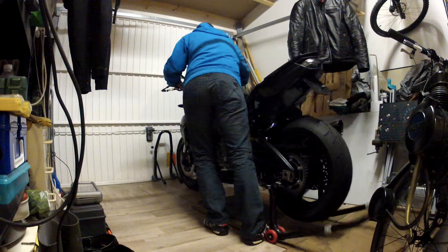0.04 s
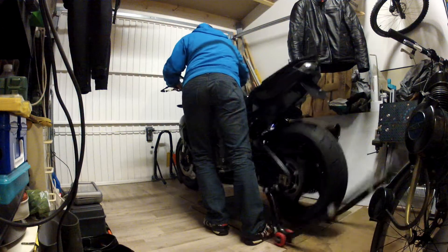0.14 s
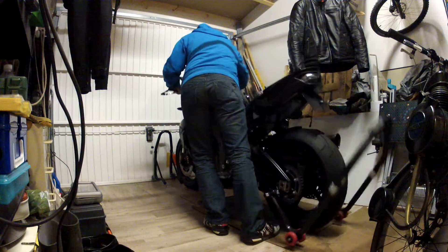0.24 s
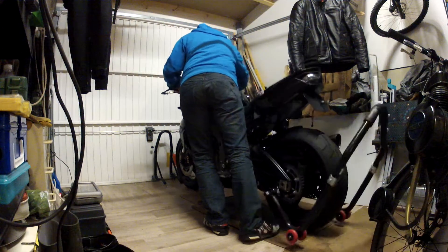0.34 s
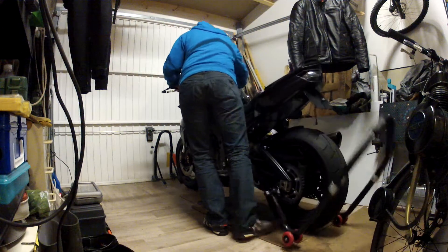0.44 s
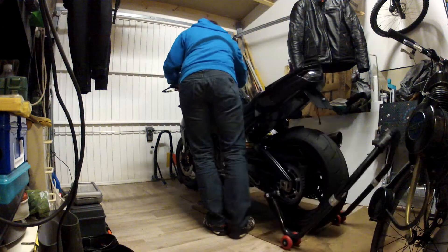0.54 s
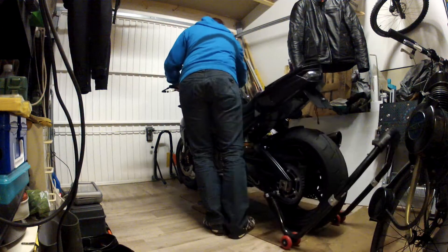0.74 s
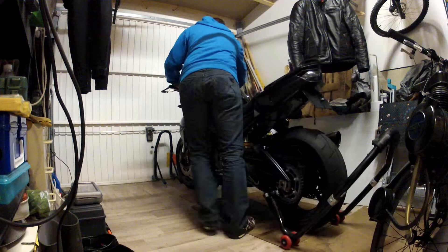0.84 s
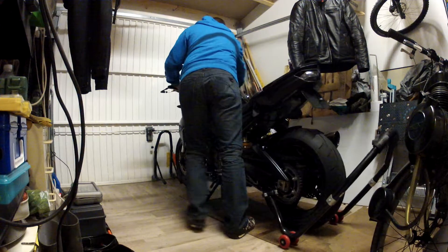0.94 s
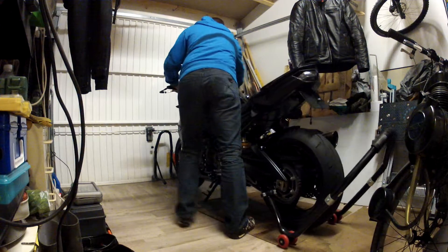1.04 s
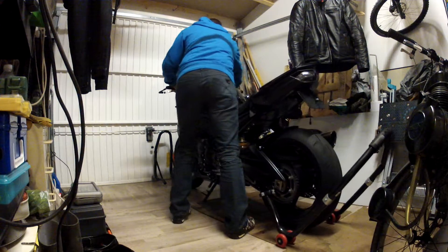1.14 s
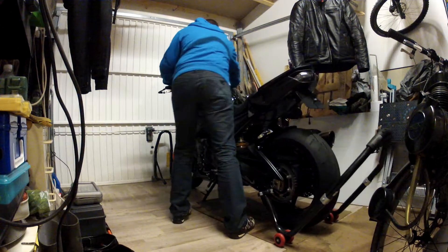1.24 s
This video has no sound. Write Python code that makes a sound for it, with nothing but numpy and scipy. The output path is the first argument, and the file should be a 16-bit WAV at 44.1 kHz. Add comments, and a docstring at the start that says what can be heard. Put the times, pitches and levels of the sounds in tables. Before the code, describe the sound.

A metal motorcycle stand rattles and crashes onto a garage floor as the bike lands.

```python
"""A steel paddock stand rattles and crashes as a motorcycle is rolled off it in a small garage.
The stand's wheels grind over grit, its loose hooks rattle, and the bike lands with dull knocks and
a low boom. The tube frame crashes and rebounds, its paired modes beating as they decay. A shoe is
set down and a small part clicks. Each impact excites a damped vibration and the room's reverberation."""
import sys
import numpy as np
from scipy import signal
from scipy.fft import rfft, irfft
from scipy.io import wavfile
from scipy.ndimage import uniform_filter1d

SR = 44100
rng = np.random.default_rng(int(sys.argv[2]) if len(sys.argv) > 2 else 0)


def materialize(psi):
    """Save the field psi as 16-bit PCM at rate SR to the path in sys.argv[1].

    A 1-D psi becomes a single channel; in a 2-D psi each row is a channel.
    """
    bounded = np.clip(np.atleast_2d(psi).T, -1, 1)
    quanta = np.round(bounded * 32767).astype(np.int16)
    wavfile.write(sys.argv[1], SR, quanta)


N = 57330
T = np.arange(N) / SR
BIN_HZ = np.arange(N // 2 + 1) * SR / N


def from_db(db):
    """Amplitude grows tenfold for every 20 dB."""
    return 10 ** (np.asarray(db) / 20)


def at_hz(points, hz):
    """Interpolation on a logarithmic frequency axis."""
    frequencies, values = np.transpose(points)
    return np.interp(np.log(np.maximum(hz, 1)), np.log(frequencies), values)


def noise(spectrum):
    """Spectral shaping: white noise is weighted by frequency and scaled to unit rms."""
    x = irfft(rfft(rng.standard_normal(N)) * from_db(at_hz(spectrum, BIN_HZ)), N)
    return x / x.std()


def decay(hits, t60, attack_s=.0005):
    """Incoherent summation: the envelope of impacts whose energies add and decay exponentially."""
    energy = np.zeros(N)
    for s, db in hits:
        energy[int(s * SR)] += from_db(db) ** 2
    retained = np.exp(-2 * np.log(1000) / (t60 * SR))
    amplitude = np.sqrt(signal.lfilter([1], [1, -retained], energy + 1e-24))
    lag = np.exp(-1 / (attack_s * SR))
    return signal.lfilter([1 - lag], [1, -lag], amplitude)


# Reverberation of the garage: (frequency [Hz], T60 [s])
GARAGE_T60 = [(60, 0.54), (250, 0.55), (1000, 0.33), (3000, 0.3666), (6000, 0.3457), (15000, 0.41)]
def impacts(hits, spectrum, level_db, ring_t60, room_db):
    """Impact noise: a contact transient, a decay of dense modes, and reverberation band by band."""
    contact = from_db(-3) * decay(hits, t60=.0033)
    direct = noise(spectrum) * np.hypot(decay(hits, ring_t60), contact)
    diffuse = rfft(noise(spectrum))
    centres, tail = np.geomspace(60, 15000, 9), 0
    for centre, weights in zip(centres, np.eye(len(centres))):
        band = irfft(diffuse * at_hz(np.c_[centres, weights], BIN_HZ), N)
        tail = tail + band * decay(hits, at_hz(GARAGE_T60, centre))
    return from_db(level_db) * (direct + from_db(room_db) * tail)


def ring(hits, modes, scatter_db=.5):
    """Modal superposition: each blow lands on another spot, so it drives each mode differently."""
    out = np.zeros(N)
    for hz, mode_db, t60 in modes:
        blows = [(s, db - scatter_db * rng.standard_normal()) for s, db in hits]
        out += from_db(mode_db) * decay(blows, t60) * np.sin(2 * np.pi * (hz * T + rng.random()))
    return out


# Background of the garage: (frequency [Hz], relative level [dB])
AIR_SPECTRUM = [(25, -18), (55, -4.5), (90, -8), (170, -9.5), (270, -6.5), (420, -14.5), (600, -15),
                (850, -21), (1700, -23), (4500, -27.5), (15000, -37)]
def air():
    """Stationary noise: the quiet air of the room, strongest in the bass."""
    return from_db(-63) * noise(AIR_SPECTRUM)


# Swell of the grinding as the stand tips: (time [s], relative level [dB])
ROLL_ENVELOPE = [(0, -55), (.07, -37), (.17, -28.5), (.188, -16.5), (.204, 1.5), (.226, 0), (.25, 5),
                 (.30, -46), (.36, -60)]
# Wheels on the floor: (frequency [Hz], relative level [dB])
ROLL_SPECTRUM = [(40, -10), (130, 2), (330, 7), (600, -5), (1000, -3.5), (1500, 0.5), (2100, -21),
                 (2900, -7), (4500, -19), (8000, -19.5), (15000, -15.5)]
def stand_wheels(level_db=-39, grit_db=2.5):
    """Roughness excitation: grit under the small wheels modulates their rolling noise."""
    grit = uniform_filter1d(rng.standard_normal(N), size=130)
    swell_db = np.interp(T, *np.transpose(ROLL_ENVELOPE))
    return noise(ROLL_SPECTRUM) * from_db(level_db + swell_db + grit_db * grit / grit.std())


# Mode clusters of the tube wall: (frequency [Hz], bandwidth [Hz], relative gain [1])
WALL_CLUSTERS = [(3240, 110, .6), (4270, 200, .8), (5360, 220, 1), (6650, 240, 1), (7770, 220, .7),
                 (8650, 220, .45), (10150, 200, .4)]
def tube_wall(x, cluster_db):
    """Resonance: the wall reinforces the bands in which its modes crowd together."""
    peaks = sum(gain * signal.lfilter(*signal.iirpeak(hz, hz / width_hz, fs=SR), x)
                for hz, width_hz, gain in WALL_CLUSTERS)
    return x + from_db(cluster_db) * peaks


# Hook contacts as the stand swings up: (time [s], relative level [dB])
HOOK_HITS = [(.2025, -23), (.279, 0), (.284, -3.5), (.290, -2), (.303, -16.5), (.324, -28.5), (.347, -6.5),
             (.364, -14), (.385, -19), (.412, -18.5), (.435, -20), (.459, -14.5), (.477, -10.5),
             (.485, -16.5), (.503, -6.5)]
# Their impact noise: (frequency [Hz], relative level [dB])
HOOK_SPECTRUM = [(80, -14), (200, -6), (400, -5), (900, -5), (2000, 1), (3300, -7), (4900, -12),
                 (6300, -6.5), (7200, -16), (8600, -11.5), (11000, -12.5), (15000, -14)]
# Modes they excite: (frequency [Hz], relative level [dB], T60 [s])
HOOK_MODES = [(1519, -33, .52), (1846, -31, .38), (2130, -38, .35), (2243, -41, .3), (2925, -36, .33),
              (2971, -39, .33), (3435, -39, .37), (3521, -37, .26), (4274, -44, .3), (5305, -37, .26),
              (5450, -40, .22), (6560, -42, .22), (6680, -40, .25), (8479, -43, .18), (10150, -47, .3)]
def hook_rattle():
    """Intermittent contact: loose hooks strike repeatedly and the lightly damped steel rings on."""
    rattle = impacts(HOOK_HITS, HOOK_SPECTRUM, level_db=-25, ring_t60=.041, room_db=-5.5)
    return tube_wall(rattle, cluster_db=2) + from_db(-5) * ring(HOOK_HITS, HOOK_MODES)


# Jolts of the bike's weight: (time [s], relative level [dB])
JOLTS = [(.205, -10.5), (.25, -1), (.28, -5.5), (.44, -10.5), (.512, -3), (.585, -1), (.70, -14),
         (.77, -12)]
# Modes of tyre and floor: (frequency [Hz], relative level [dB], T60 [s])
BOOM_MODES = [(53.3, -43.5, .4), (65.07, -34.5, 0.44), (76, -40, .4), (97.8, -36.5, 0.22)]
def bike_boom(cutoff_hz=130):
    """Mass-spring resonance: the heavy bike rocks on its tyre and jolts the floor."""
    return signal.sosfilt(signal.butter(2, cutoff_hz, fs=SR, output="sos"), ring(JOLTS, BOOM_MODES))


# Landing of the rear wheel: (time [s], relative level [dB])
LANDING_HITS = [(.230, -8), (.240, -5.5), (.2555, -1), (.262, -3.5), (.277, -3.5)]
# Dull body of the bike: (frequency [Hz], relative level [dB])
CHASSIS_SPECTRUM = [(40, -25), (130, -4), (220, -6.5), (300, 7), (480, -6.5), (900, -6.5), (1350, -8),
                    (2500, -13), (4500, -17), (6500, -25.5), (10000, -19.5), (15000, -23)]
# Its modes: (frequency [Hz], relative level [dB], T60 [s])
CHASSIS_MODES = [(277, -26, .16), (328, -31, .55), (362, -39, .14), (585, -43, .15)]
def bike_knocks():
    """Damped free vibration: swingarm and chassis knock as they take the weight."""
    knocks = impacts(LANDING_HITS, CHASSIS_SPECTRUM, level_db=-24, ring_t60=.05, room_db=-8)
    return knocks + from_db(-1.5) * ring(LANDING_HITS, CHASSIS_MODES)


# Crash and rebounds of the stand: (time [s], relative level [dB])
FRAME_HITS = [(.509, -3.5), (.5135, 0), (.523, -0.5), (.532, -18), (.546, -8), (.558, -5.5), (.566, -6),
              (.5735, 0.5), (.580, -9), (.585, -5.5), (.593, -9), (.606, -34), (.652, -29)]
# Their impact noise: (frequency [Hz], relative level [dB])
FRAME_SPECTRUM = [(50, 0.5), (150, -3), (300, 0.5), (700, -3.5), (1400, 1.5), (2800, -1.5), (4300, -5),
                  (5900, -9), (7800, -8.5), (10500, -12.5), (15000, -14.5)]
# Modes of the tube frame: (frequency [Hz], relative level [dB], T60 [s])
FRAME_MODES = [(722, -38, .2), (1067, -41, .26), (1216, -35, .22), (1352, -35.5, .22), (1405, -39, .32),
               (1592, -39, .22), (1681, -38, .24), (2024, -39, .22), (2404, -38, .22), (2578, -38, .22),
               (2964, -36, .22), (3240, -36, .3), (3685, -41, .22), (4190, -42, .42), (4283, -38, .44),
               (5360, -40, .28), (6632, -45, .3), (7690, -43, .3), (7811, -46, .45), (8753, -47, .32)]
def stand_crash(mean_split_hz=31.03, twin_db=-6):
    """Beating: a struck tube's modes come in close pairs that pulse at their difference frequency."""
    crash = impacts(FRAME_HITS, FRAME_SPECTRUM, level_db=-21, ring_t60=.093, room_db=-12.5)
    twins = [(hz + mean_split_hz * rng.uniform(.7, 1.3), db + twin_db, t60)
             for hz, db, t60 in FRAME_MODES]
    beating = ring(FRAME_HITS, FRAME_MODES) + ring(FRAME_HITS, twins)
    return tube_wall(crash, cluster_db=2.5) + from_db(-5) * beating


# Contacts of sole and floor: (time [s], relative level [dB])
SHOE_HITS = [(1.120, -23), (1.135, -18.5), (1.183, -6), (1.1945, 0), (1.208, -5), (1.223, -10)]
# Their impact noise: (frequency [Hz], relative level [dB])
SHOE_SPECTRUM = [(50, -11), (150, -14.5), (290, 13), (550, -15), (900, -13), (1400, -3.5), (2500, -12.5),
                 (5000, -20), (15000, -22)]
def shoe():
    """Compliant impact: a soft step puts most of its energy into low frequencies."""
    return impacts(SHOE_HITS, SHOE_SPECTRUM, level_db=-45, ring_t60=.095, room_db=-7.5)


# Clicks of a small part: (time [s], relative level [dB])
PART_HITS = [(1.249, 1.5), (1.255, -2), (1.267, -5.5)]
# Their impact noise: (frequency [Hz], relative level [dB])
PART_SPECTRUM = [(100, 9), (300, -20), (800, -8.5), (1450, 3.5), (2200, -7.5), (5000, -14), (15000, -16.5)]
# Modes of the part: (frequency [Hz], relative level [dB], T60 [s])
PART_MODES = [(1390, -51.5, 0.12), (1460, -64, 0.12)]
def small_part():
    """Impulse excitation: a light metal part on the bike clicks and rings briefly."""
    clicks = impacts(PART_HITS, PART_SPECTRUM, level_db=-50, ring_t60=.056, room_db=-9)
    return clicks + ring(PART_HITS, PART_MODES)


def scene():
    """Linear superposition: the pressures of all sources add in one channel."""
    roll_off = stand_wheels() + hook_rattle() + bike_boom() + bike_knocks() + stand_crash()
    return (air() + roll_off + shoe() + small_part())[None]


# Dips in the microphone's response: (frequency [Hz], bandwidth per pass [Hz])
MIC_DIPS = [(6020, 390), (11950, 2050)]
def record(dry, low_cut_hz=36, stopband_hz=15900):
    """Frequency response: the microphone loses deep bass, two bands of treble and the very top."""
    x = signal.sosfilt(signal.butter(4, low_cut_hz, "high", fs=SR, output="sos"), dry)
    for hz, width_hz in MIC_DIPS:
        b, a = signal.iirnotch(hz, hz / width_hz, fs=SR)
        x = signal.lfilter(b, a, signal.lfilter(b, a, x))
    return signal.sosfilt(signal.cheby2(20, 60, stopband_hz, fs=SR, output="sos"), x)


dry = scene()
out = record(dry)
materialize(out)
```